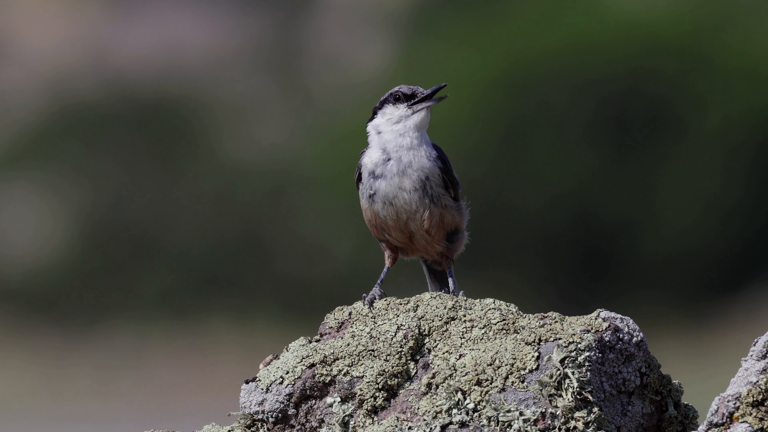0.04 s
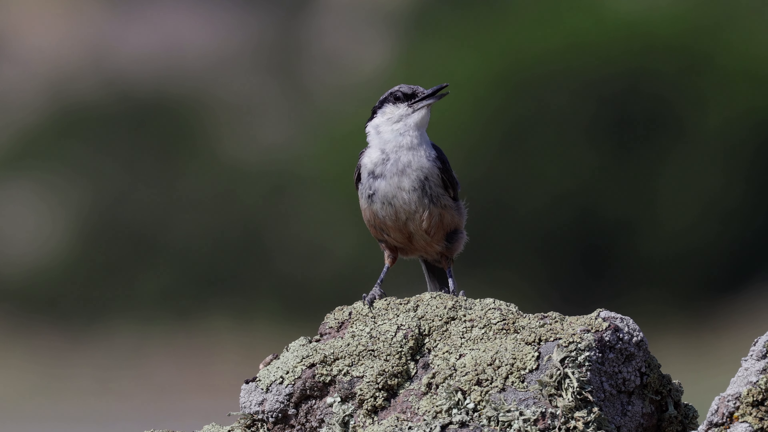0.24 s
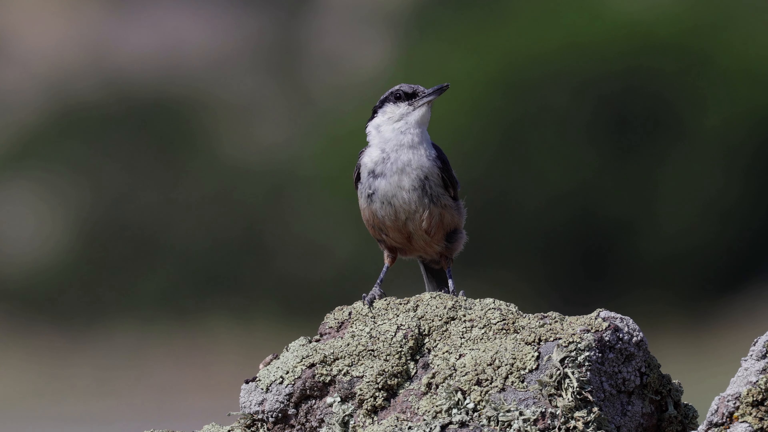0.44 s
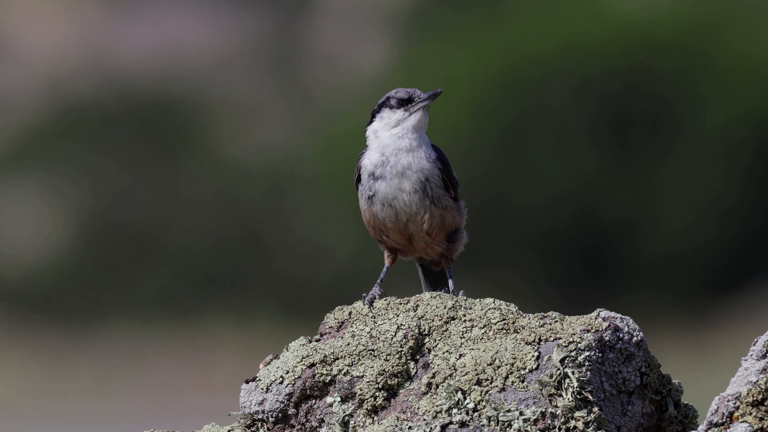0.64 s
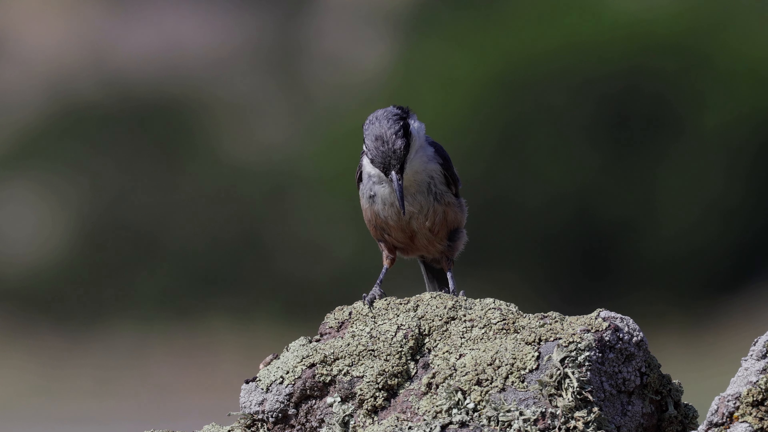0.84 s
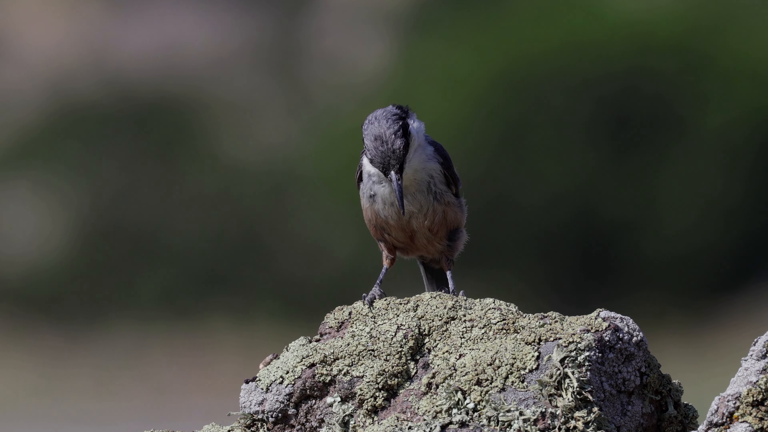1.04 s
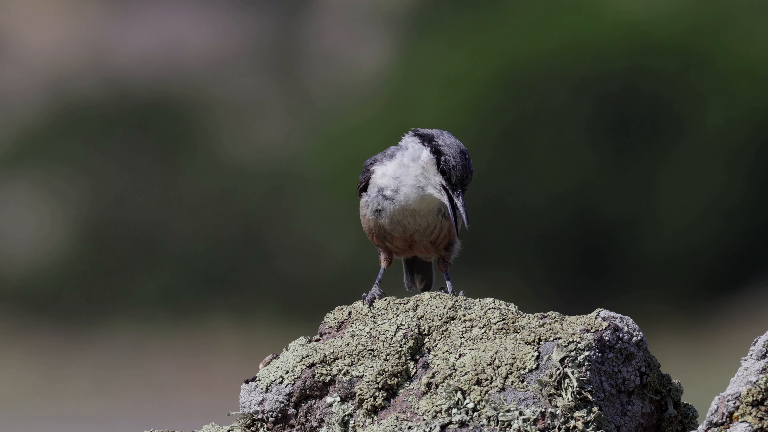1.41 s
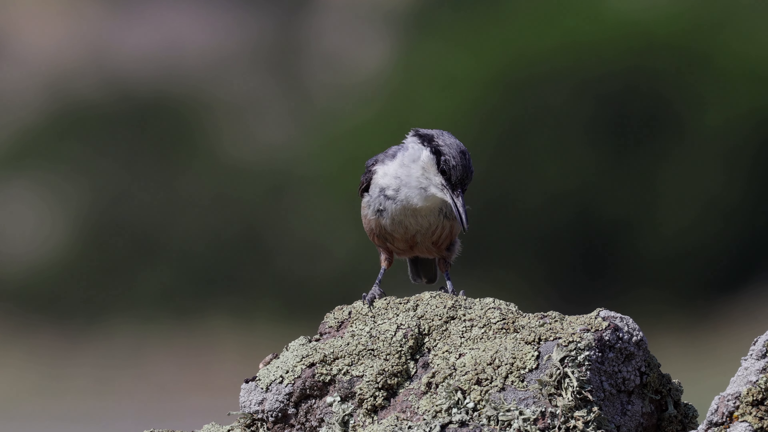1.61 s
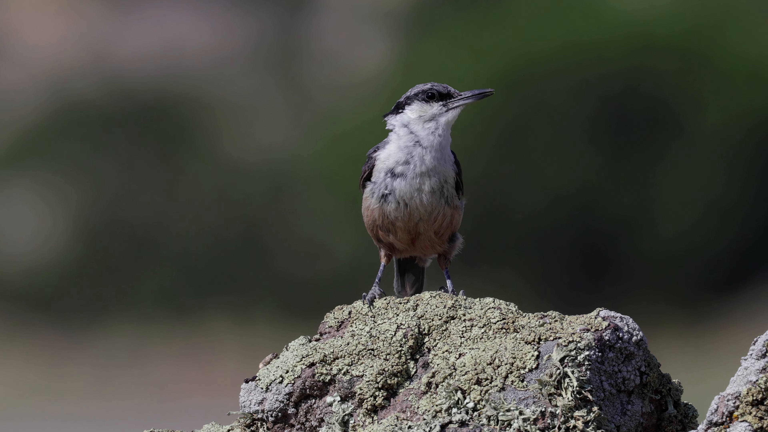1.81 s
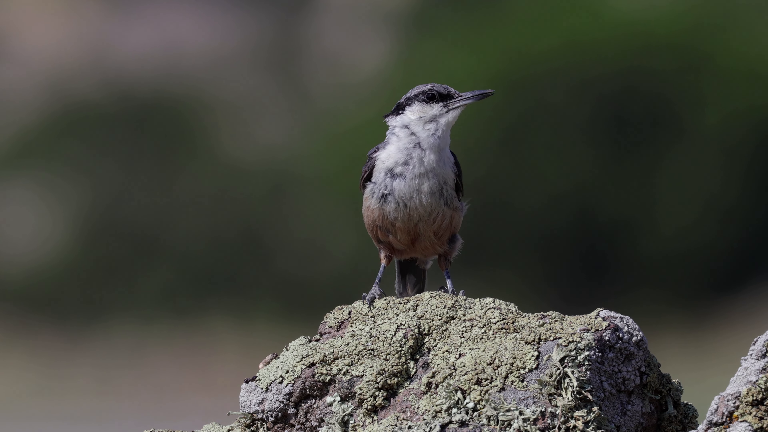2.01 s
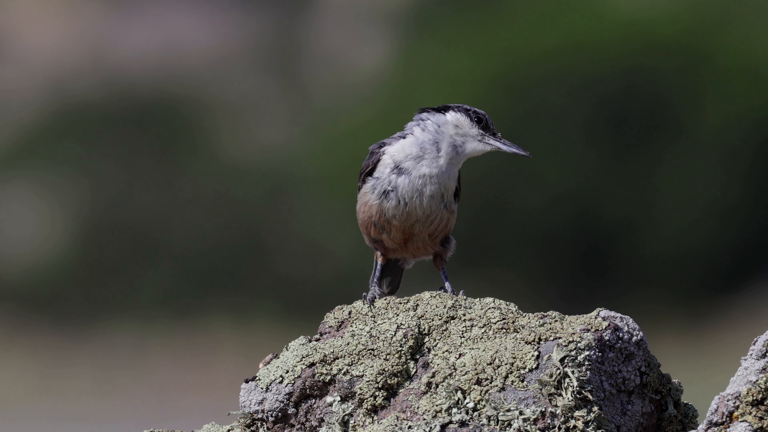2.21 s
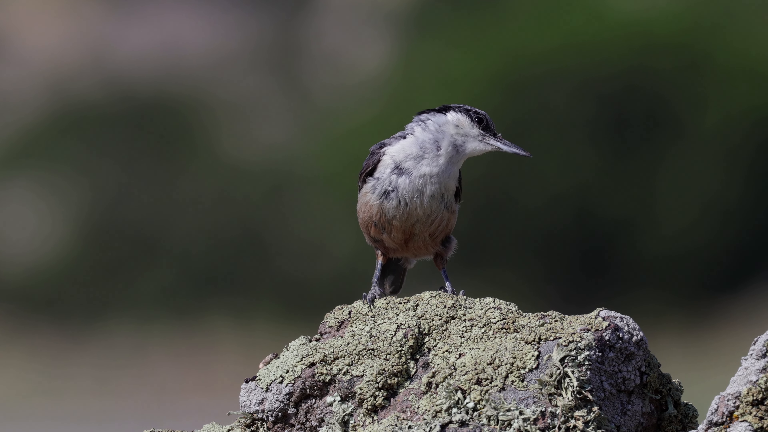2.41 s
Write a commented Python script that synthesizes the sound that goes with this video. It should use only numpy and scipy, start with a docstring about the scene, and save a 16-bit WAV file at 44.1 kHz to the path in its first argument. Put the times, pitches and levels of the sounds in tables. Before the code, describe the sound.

A small bird whistles a quick, even series of rising chirps outdoors.

```python
"""On an open hillside, a nuthatch on a boulder whistles thirteen quick rising chirps, nearly six a second.
Each is one upward frequency sweep with weak overtones, rippled by interference with its reflection
off the rock and returned faintly by the slope. Far birds call thinly behind it, over steady air,
a distant rush with a faint hum and a wavering tone, and a little wind on the microphone."""
import sys
import numpy as np
from scipy import signal
from scipy.fft import rfft, irfft
from scipy.io import wavfile
from scipy.ndimage import uniform_filter1d

SR = 44100
rng = np.random.default_rng(int(sys.argv[2]) if len(sys.argv) > 2 else 0)


def unload_audio(sound):
    """Save the sound as a 16-bit wav file, at the path given as the first command line argument."""
    columns = np.transpose(np.atleast_2d(sound))
    # keep every value between -1 and 1, then stretch to whole-number steps
    steps = np.round(np.clip(columns, -1, 1) * 32767)
    wavfile.write(sys.argv[1], SR, steps.astype(np.int16))


N = 112454
TIME = np.arange(N) / SR
FREQS = np.arange(N // 2 + 1) * SR / N
MS = 1 / 1000


def undb(db):
    """Amplitude ratio: tenfold for every 20 dB."""
    return 10 ** (np.asarray(db) / 20)


def envelope(points):
    """Amplitude envelope through (time [s], level [dB]) points."""
    return undb(np.interp(TIME, *np.array(points).T))


def response(hz, points):
    """Frequency response: the gain at hz of a (frequency [Hz], level [dB]) curve."""
    f, db = np.array(points, float).T
    return undb(np.interp(np.log(hz + 1), np.log(f), db))


def noise(gain):
    """Spectral shaping: white noise weighted at each frequency, then scaled to rms 1."""
    x = irfft(rfft(rng.standard_normal(N)) * gain, N)
    return x / np.sqrt(np.mean(x ** 2))


def band(hz, width_hz):
    """Resonance: noise concentrated around one frequency."""
    detuning = (FREQS ** 2 - hz ** 2) / (2 * (FREQS + 1) * width_hz)
    return noise(1 / (1 + 2 * detuning ** 2))


def drift(rate_hz):
    """Random modulation: low-pass noise of rms 1."""
    return noise(np.exp(-(FREQS / rate_hz) ** 2))


def delay(x, seconds):
    """Travel time as a phase lag proportional to frequency."""
    return irfft(rfft(x) * np.exp(-2j * np.pi * FREQS * seconds), N)


# Spectrum of still air and distance (frequency [Hz], relative level [dB])
AIR_SPECTRUM = [(15, -10), (25, 2), (64, -2), (122, -2), (183, -3), (340, -7), (410, -6), (1020, -10),
                (1450, -8), (2060, -12.5), (2700, -16), (4150, -16.5), (4750, -21.5), (7700, -22),
                (15500, -30.5)]


def air():
    """Ambient noise: a broad, nearly steady spectrum that falls toward the treble."""
    return undb(-49.5 + 0.22 * drift(18)) * noise(response(FREQS, AIR_SPECTRUM))


# Swell of the distant rush (time [s], upper band level [dB], lower band level [dB])
RUSH_SWELL = [(0, -83, -58.5), (.45, -82, -63), (.78, -66, -59.5), (1.1, -56, -56), (1.72, -57, -53.5),
              (2.23, -47.5, -56), (2.55, -53, -53)]


def distant_rush():
    """Amplitude modulation: two broad noise bands swell separately."""
    times, upper_db, lower_db = np.array(RUSH_SWELL).T
    upper = undb(np.interp(TIME, times, upper_db)) * band(1190, width_hz=770)
    lower = undb(np.interp(TIME, times, lower_db)) * band(583, width_hz=215)
    return upper + lower


# Bands of the distant hum (frequency [Hz], width [Hz], level [dB])
HUM_BANDS = [(79.7, 3.8, -63.5), (122.8, 4.8, -69), (151.3, 3.4, -64), (208.5, 7.1, -65.5),
             (394.6, 2.6, -67)]


def distant_hum():
    """Narrowband noise: bands a few hertz wide are heard as low, unsteady pitches."""
    return sum(undb(db) * band(hz, width) for hz, width, db in HUM_BANDS)


# Strength of the gusts (time [s], level [dB])
GUSTS = [(0, -52.5), (.15, -53), (.25, -58), (1.08, -61.5), (1.16, -53), (1.3, -51.5), (1.42, -43),
         (1.53, -44.5), (1.6, -50.5), (1.9, -68), (2.2, -52.5), (2.32, -67), (2.55, -59)]
# Spectrum of their rumble (frequency [Hz], relative level [dB])
GUST_SPECTRUM = [(15, 1), (40, 7.5), (80, 1.5), (160, -8), (400, -26), (1500, -61)]


def wind():
    """Turbulence: gusts on the microphone make low-frequency pressure fluctuations."""
    flutter = undb(0.55 * drift(12))
    return envelope(GUSTS) * flutter * noise(response(FREQS, GUST_SPECTRUM))


# Coming and going of a faint tone above the hum (time [s], rms level [dB])
TONE_SWELL = [(0, -57.5), (.17, -58), (.26, -65), (.65, -69), (.74, -53.5), (.88, -59.5), (1, -65),
              (1.38, -65.5), (1.55, -57), (2.5, -64)]


def far_tone():
    """Random frequency modulation: a pure tone wavers by about one percent."""
    hz = 490 * (1 + 0.01195 * drift(9.93))
    return envelope(TONE_SWELL) * np.sqrt(2) * np.sin(2 * np.pi * np.cumsum(hz) / SR)


def reverberation(x, t60_s, dull_hz):
    """Diffuse reflection: many small echoes, weak in treble, decay exponentially."""
    tail = noise(1 / (1 + (FREQS / dull_hz) ** 2)) * undb(-60 * TIME / t60_s)
    return signal.fftconvolve(x, tail / np.sqrt(np.sum(tail ** 2)))[:N]


def whistles(calls, length_s, start_hz, top_hz, turn):
    """Frequency glide: the pitch follows a parabola, peaking at the fraction turn of each call."""
    out = np.zeros(N)
    waver = 1 + 0.0042 * drift(300)
    for start, db in calls:
        on = (TIME > start) & (TIME < start + length_s)
        progress = (TIME[on] - start) / length_s
        hz = (top_hz - (top_hz - start_hz) * (progress / turn - 1) ** 2) * waver[on]
        swell = np.sin(np.pi * progress ** 0.73)
        out[on] += undb(db) * swell * np.sin(2 * np.pi * np.cumsum(hz) / SR)
    return out


# Arched calls of a far bird (time [s], level [dB])
ARCHED_CALLS = [(.069, -49), (.333, -48), (.553, -48), (.858, -48.5), (1.227, -49.5), (1.575, -53.5),
                (2.197, -48), (2.514, -51.5)]
# Thin falling pips, farther off (time [s], level [dB])
FALLING_PIPS = [(.207, -58), (.417, -57), (.529, -58), (.745, -55), (.963, -60), (1.288, -52.5),
                (1.671, -58), (1.768, -57), (2.108, -59)]
# One soft, nearly level whistle (time [s], level [dB])
SOFT_WHISTLE = [(.03, -53)]


def far_birds():
    """Direct and reverberant sound: faint pure-tone calls, each with a short tail."""
    calls = whistles(ARCHED_CALLS, length_s=.028, start_hz=4200, top_hz=5850, turn=.58)
    calls += whistles(FALLING_PIPS, length_s=.016, start_hz=7600, top_hz=7720, turn=.28)
    calls += whistles(SOFT_WHISTLE, length_s=.14, start_hz=1627, top_hz=1770, turn=.58)
    return calls + undb(-12) * reverberation(calls, t60_s=.16, dull_hz=9000)


# Strength of the hillside echo, greatest in mid-series (time [s], gain [dB])
ECHO_GAIN = [(0, -28), (.9, -22.5), (1.6, -22.5), (1.9, -29), (2.55, -28)]


def hillside(x, echo_s=.055, echo_hz=3280, half_width_hz=150):
    """Reflection: scatter from nearby stones, a faint longer tail and one narrowband echo."""
    stones = reverberation(delay(x, seconds=.0034), t60_s=.07, dull_hz=8800)
    tail = reverberation(x, t60_s=.24, dull_hz=7100)
    passband = 1 / np.hypot(1, (FREQS - echo_hz) / half_width_hz)
    echo = irfft(rfft(delay(x, echo_s)) * passband, N)
    return undb(-26) * (stones + tail) + envelope(ECHO_GAIN) * echo


def rock_reflection(x, delay_ms, strength):
    """Interference: a sweep and its delayed copy alternately reinforce and cancel."""
    return x + strength * np.roll(x, int(round(delay_ms * MS * SR)))


# Points in a chirp (stage [-1 scoop, 0 rise, 1 shoulder, 2 flick, 3 release begins; 4 end])
STAGES = [-1, 0, .5, 1, 2, 2.5, 3, 4]
# Vocal effort at those points (relative level [dB])
STAGE_DB = [-30, -24.5, -11, -2.5, -0.5, -1.3, -4, -13.8]
# Balance of harmonics 2 to 6 (level offset [dB])
HARMONIC_DB = [3, -0.5, -13.5, -13, -5]
# Filtering of the overtones by throat and bill (frequency [Hz], gain [dB])
VOCAL_TRACT = [(2800, 17), (4500, -3.5), (6500, -5), (8500, 0.5), (10000, -6.5), (11800, -6), (13600, 10),
               (15500, 7)]


def voice(hz, stage, low_db, high_db, onset_db, flicker):
    """Source and filter: a strong fundamental, with overtones coloured by throat and bill."""
    phase = 2 * np.pi * np.cumsum(hz) / SR

    def partial(k, db):
        """Overtone at k times the fundamental, silent above the Nyquist frequency."""
        return undb(db) * response(k * hz, VOCAL_TRACT) * (k * hz < SR / 2) * np.sin(k * phase)

    onset = np.clip(2 * (1.1 - stage), 0, 1)
    tone = np.sin(phase) + partial(2, low_db + HARMONIC_DB[0] + onset_db * onset + flicker[0])
    for k in range(3, 7):
        tone += partial(k, high_db + HARMONIC_DB[k - 2] + 5 * flicker[k - 2])
    # Period doubling adds half-integer partials around the start of the flick.
    doubling = np.exp(-((stage - 2) / .27) ** 2)
    for k in (2.5, 3.5):
        tone += doubling * partial(k, low_db - 7.5)
    return tone * undb(np.interp(stage, STAGES, STAGE_DB))


def chirp(row, jitter, shimmer_db, flicker, rasp):
    """Frequency sweep: a raspy catch, a fast rise, a slower shoulder and a last upward flick."""
    start, rise_ms, shoulder_ms, flick_ms, rise_hz, shoulder_hz, top_hz = row[:7]
    db, low_db, high_db, rock_ms, rock_strength, onset_db, rasp_db = row[7:]
    scoop_ms, release_ms, scoop_hz, start_hz = 4, 4, 1000, 1340
    knots = start + MS * np.cumsum([-scoop_ms, scoop_ms, rise_ms, shoulder_ms, flick_ms, release_ms])
    on = (TIME > knots[0]) & (TIME < knots[-1])
    t = TIME[on]
    stage = np.interp(t, knots, np.arange(-1, 5))
    hz = np.interp(t, knots, [scoop_hz, start_hz, rise_hz, shoulder_hz, top_hz, .98 * top_hz])
    hz = uniform_filter1d(hz, int(3 * MS * SR), mode="nearest") * (1 + jitter[on])
    tone = voice(hz, stage, low_db, high_db, onset_db, flicker[:, on])
    # Every chirp starts about equally loud; its own strength shows as the rise goes on.
    level_db = db + (-20 - db) * np.clip(2.1 * (1 - stage), 0, 1)
    fade = np.clip((knots[-1] - t) / MS, 0, 1)
    catch = np.exp(-np.minimum(((TIME - start + .67 * MS) / (10 * MS)) ** 2, 20))
    out = undb(rasp_db) * catch * rasp
    out[on] += tone * fade * undb(level_db + shimmer_db[on])
    return rock_reflection(out, rock_ms, rock_strength)


# The nuthatch's chirps (time [s], rise [ms], shoulder [ms], flick [ms], pitch after rise [Hz],
# pitch after shoulder [Hz], top pitch [Hz], base level [dB], low overtone offset [dB],
# high overtone offset [dB], rock delay [ms], rock reflection [ratio],
# second harmonic offset at onset [dB], rasp level [dB])
SONG = [(0.1056, 17.3, 23.0, 3.0, 2870.0, 3610.0, 4250.0, -20.1, -28.0, -33.0, 1.98, 0.54, 0, -45),
        (0.3001, 17.2, 16.0, 4.9, 2820.0, 3550.0, 4280.0, -20.7, -25.0, -33.0, 1.98, 0.7, 7, -44),
        (0.4732, 20.2, 16.3, 8.1, 2790.0, 3540.0, 4390.0, -19.6, -27.0, -34.0, 1.99, 0.55, 0, -48),
        (0.6516, 21.9, 10.2, 8.2, 2990.0, 3480.0, 4440.0, -19.2, -23.0, -30.0, 1.98, 0.57, 7, -47),
        (0.8168, 22.0, 16.9, 4.8, 2990.0, 3610.0, 4620.0, -21.7, -22.0, -27, 1.99, 0.7, 3, -50),
        (0.9982, 16.1, 21.9, 7.2, 2550.0, 3320.0, 4340.0, -23.8, -19.0, -29.0, 1.96, 0.47, -14, -47),
        (1.172, 20.1, 22.2, 3.8, 2920.0, 3590.0, 4390.0, -24.9, -15, -25.0, 1.92, 0.7, 0, -46),
        (1.3512, 18.6, 23.0, 3.5, 2730.0, 3330.0, 4040.0, -19.3, -23.0, -30.0, 1.95, 0.47, -16, -49),
        (1.5185, 20.5, 14.3, 2.0, 2980.0, 3490.0, 4100.0, -19.0, -26.0, -36.0, 1.93, 0.59, -14, -48),
        (1.6913, 22.5, 17.0, 9.1, 2720.0, 3210.0, 3850.0, -18.5, -25.0, -35.0, 1.62, 0.4, -10, -47),
        (1.8642, 15.3, 26.3, 4.8, 2890.0, 3470.0, 4310.0, -18.9, -25.0, -33.0, 1.97, 0.58, 1, -47),
        (2.0446, 18.6, 17.4, 8.0, 2720.0, 3450.0, 4520.0, -18.7, -24.0, -32.0, 1.97, 0.54, 0, -48),
        (2.2272, 21.0, 19.6, 4.8, 2780.0, 3480.0, 4320.0, -20.8, -21.0, -30.0, 1.97, 0.62, 0, -49)]


def nuthatch():
    """Jitter and shimmer: pitch and level vary slightly, and each overtone flickers on its own."""
    jitter, shimmer_db = .0015 * drift(780), .15 * drift(570)
    flicker = np.tanh([drift(110) for _ in HARMONIC_DB])
    rasp = band(2045, width_hz=580)
    return sum(chirp(row, jitter, shimmer_db, flicker, rasp) for row in SONG)


def scene():
    """Superposition: background, far birds, reflections and the near bird add in one channel."""
    song = nuthatch()
    birds = far_birds()
    reflections = hillside(song)
    background = air() + distant_rush() + distant_hum() + wind() + far_tone()
    return (background + birds + reflections + song)[None]


def record(dry, cutoff_hz=15650):
    """Band limiting: a steep low-pass filter removes the highest treble."""
    return signal.sosfilt(signal.ellip(12, .1, 80, cutoff_hz, fs=SR, output="sos"), dry)


dry = scene()
out = record(dry)
unload_audio(out)
```